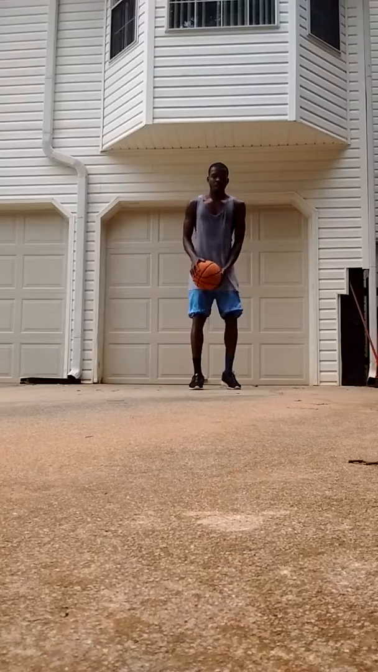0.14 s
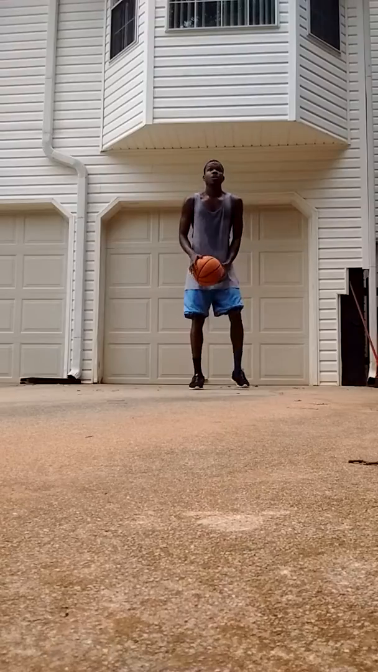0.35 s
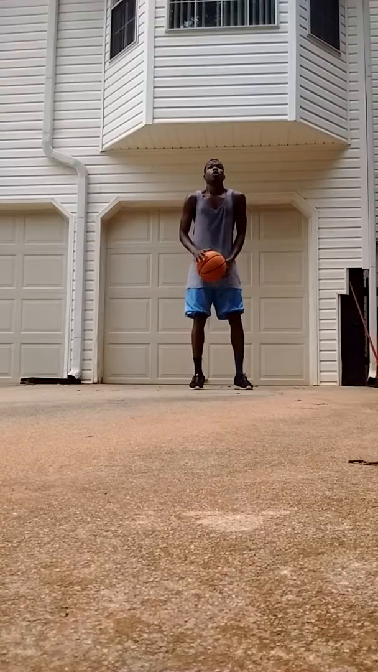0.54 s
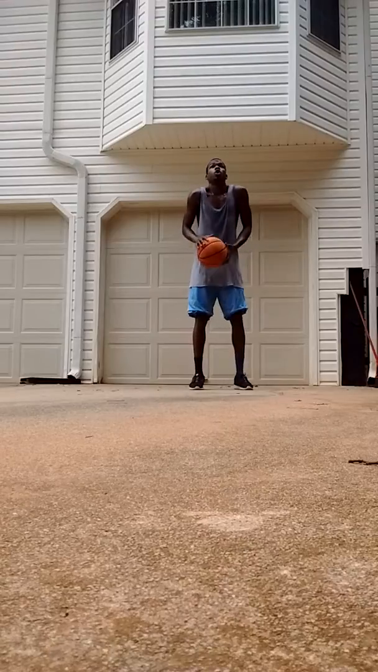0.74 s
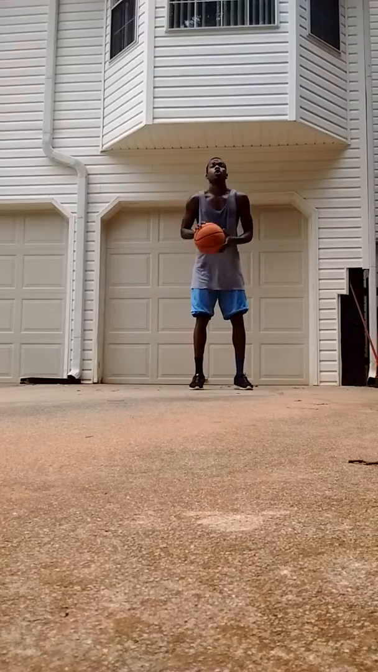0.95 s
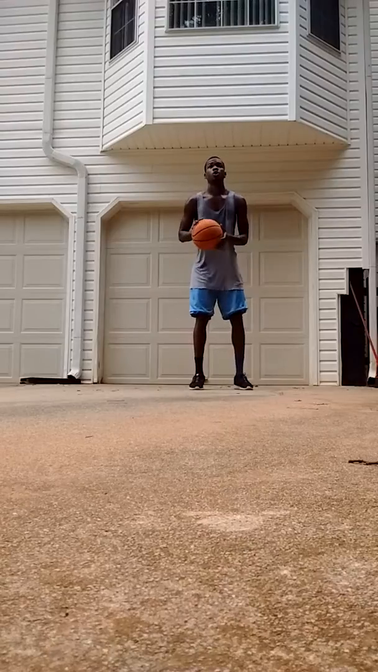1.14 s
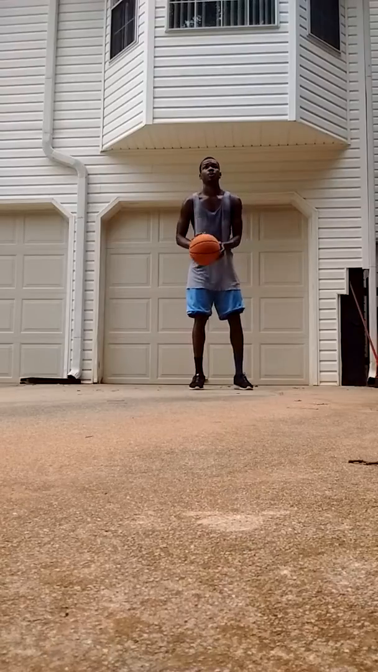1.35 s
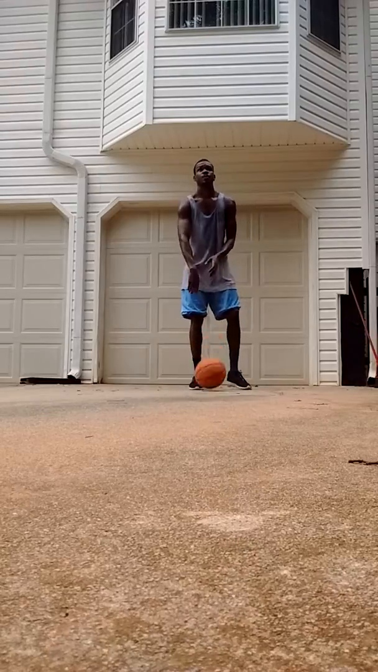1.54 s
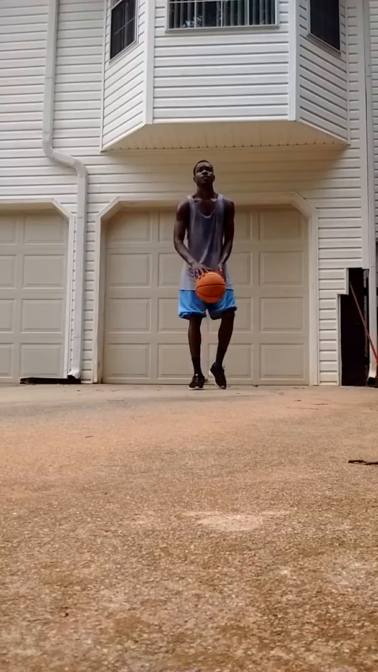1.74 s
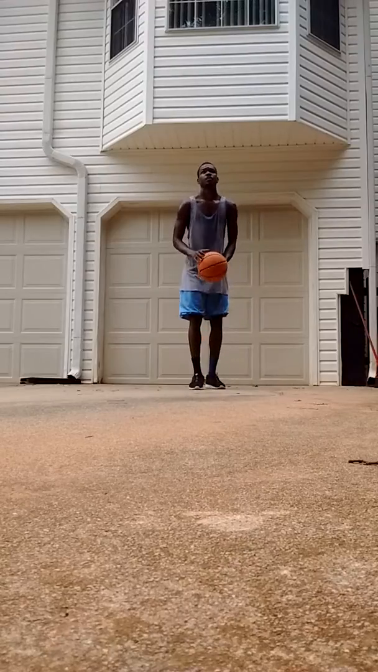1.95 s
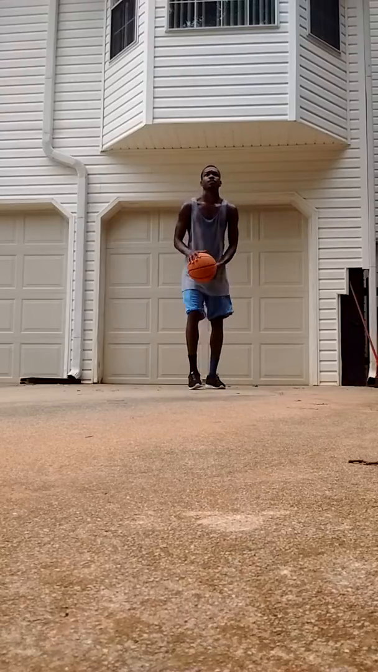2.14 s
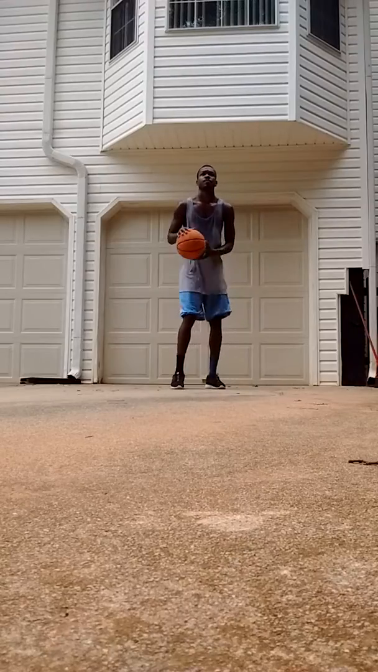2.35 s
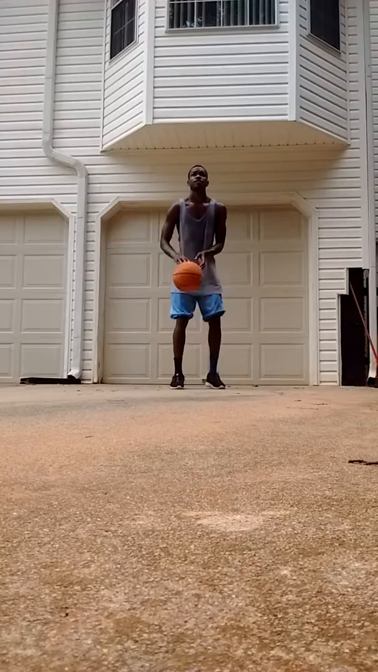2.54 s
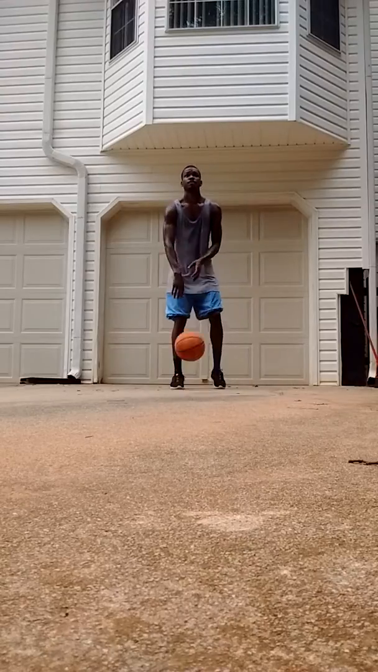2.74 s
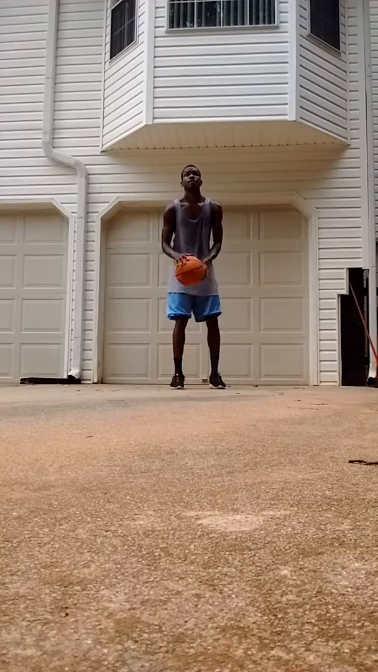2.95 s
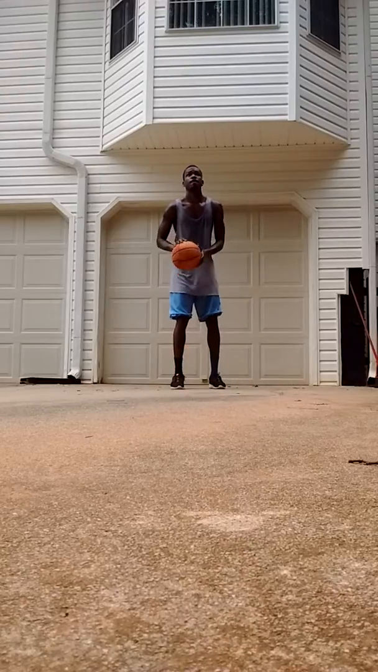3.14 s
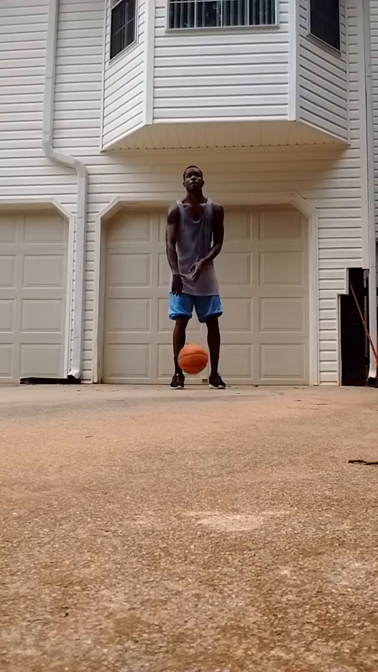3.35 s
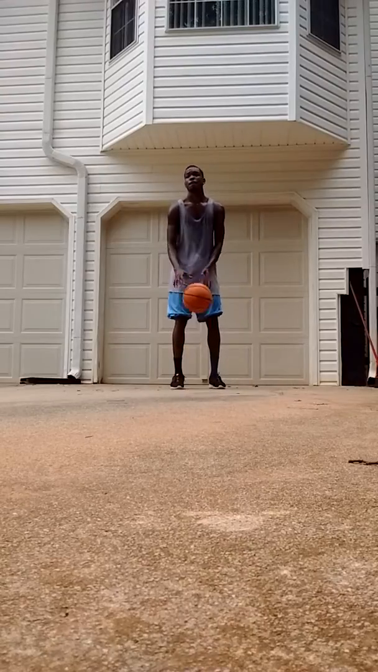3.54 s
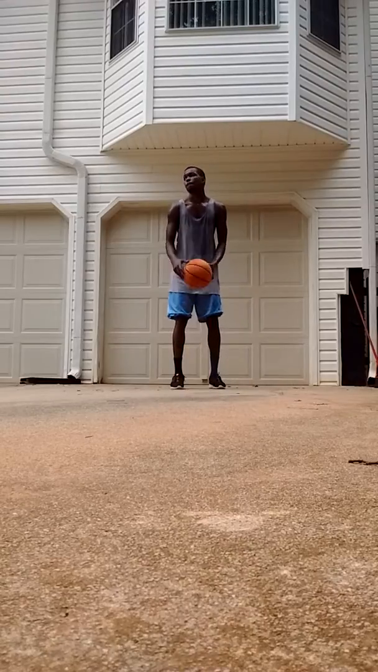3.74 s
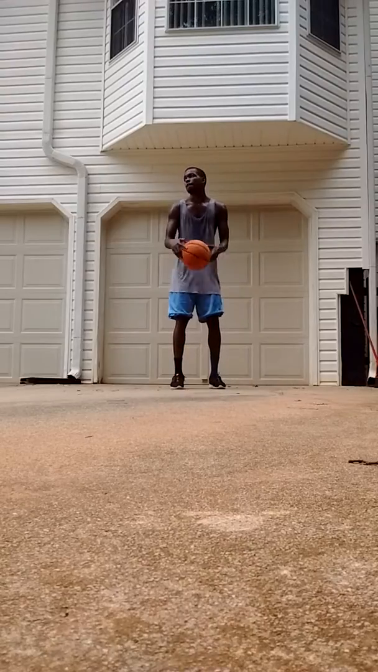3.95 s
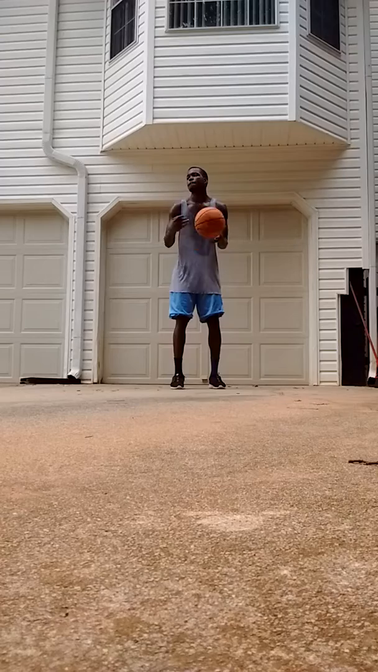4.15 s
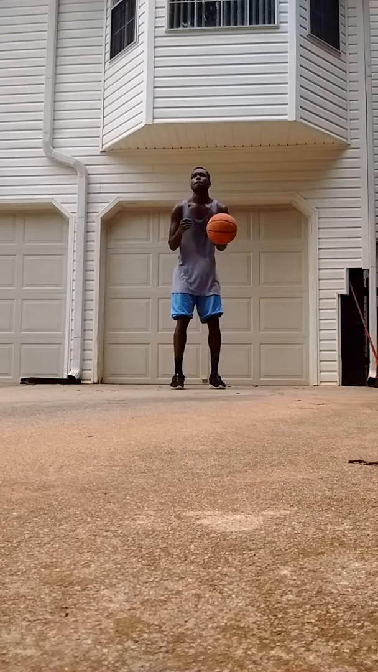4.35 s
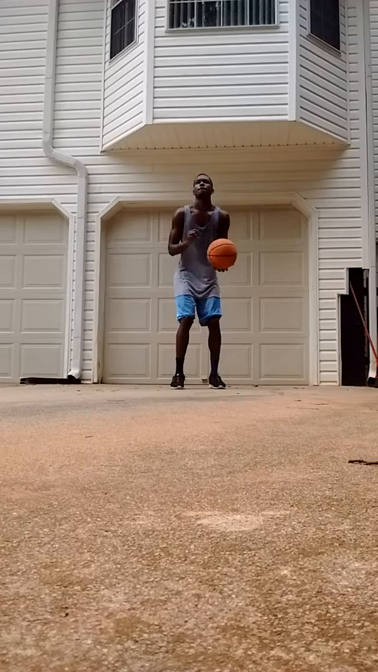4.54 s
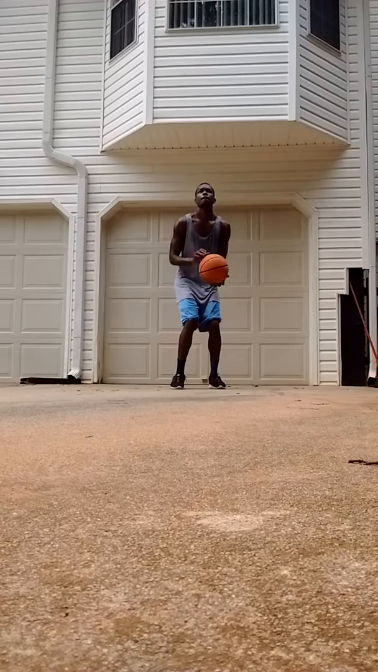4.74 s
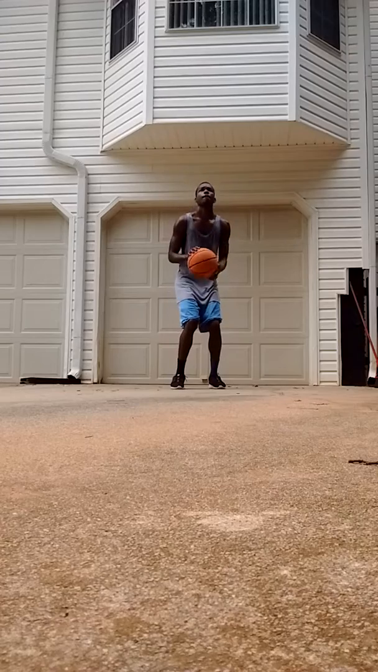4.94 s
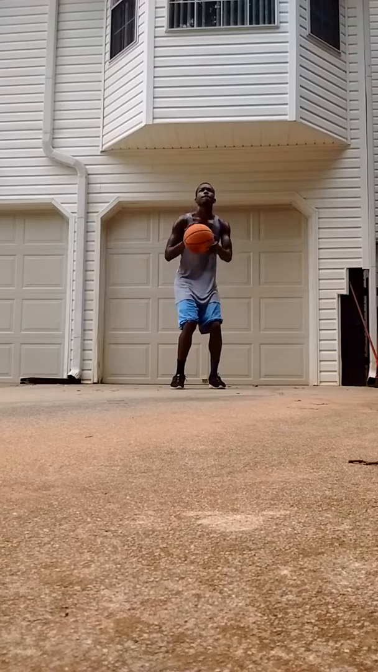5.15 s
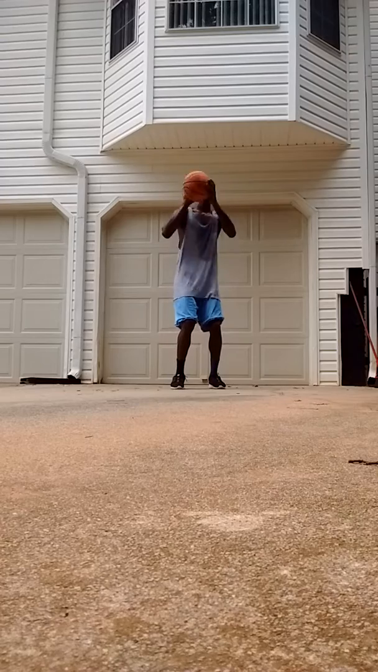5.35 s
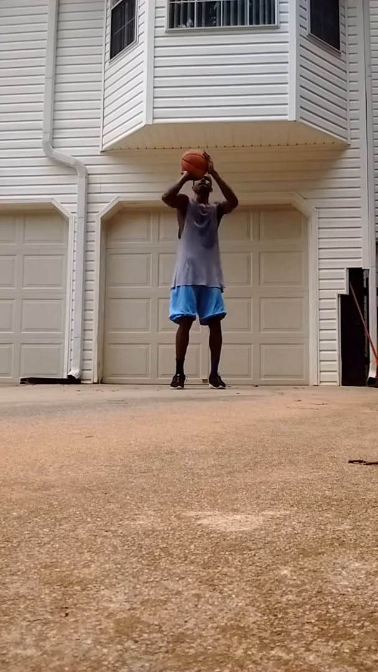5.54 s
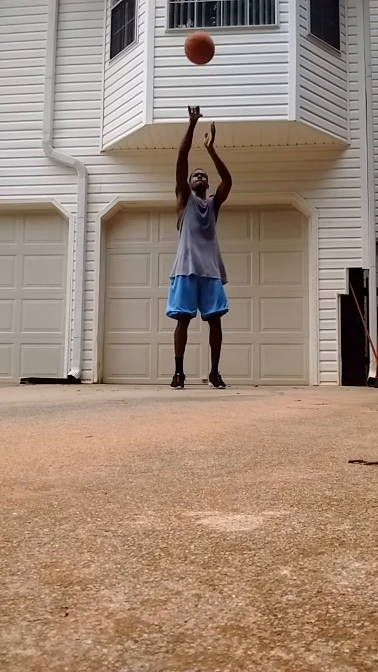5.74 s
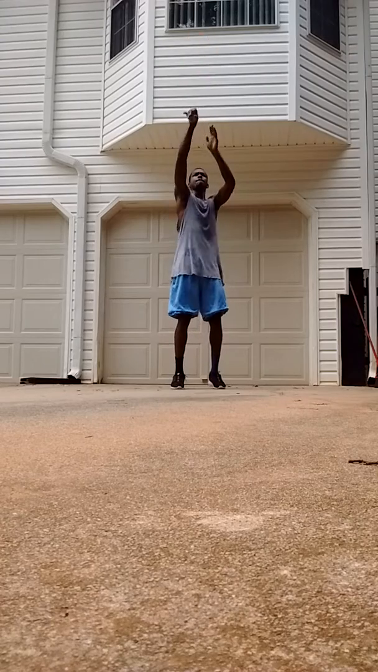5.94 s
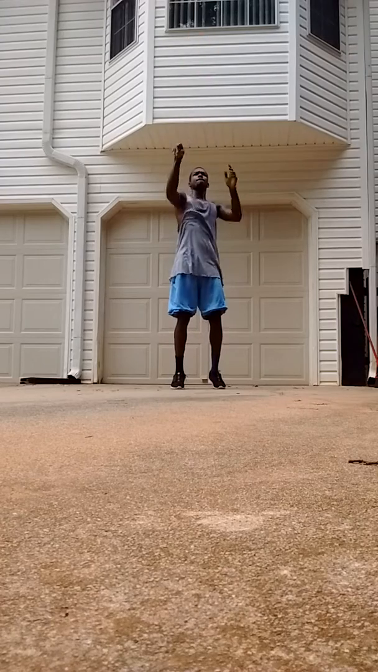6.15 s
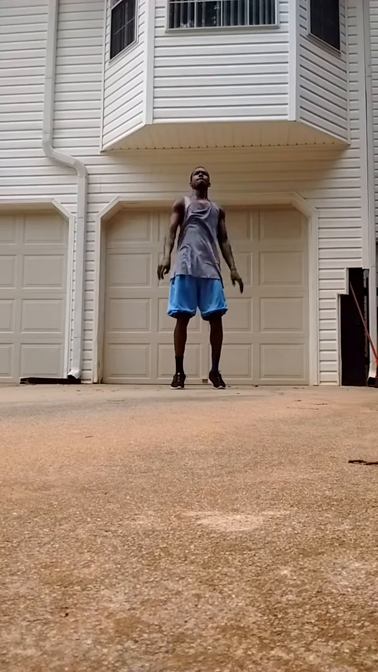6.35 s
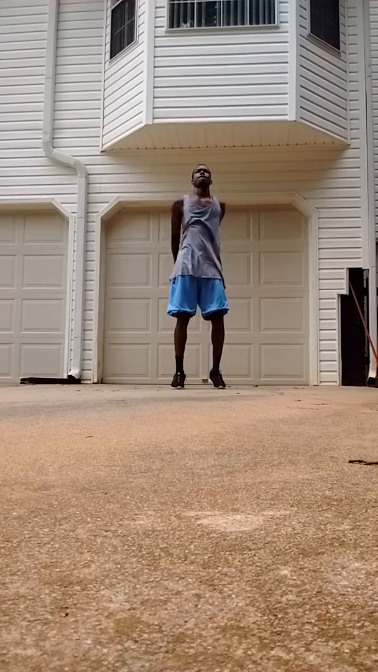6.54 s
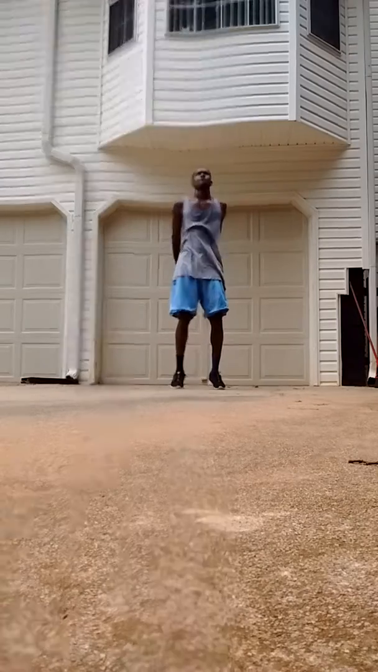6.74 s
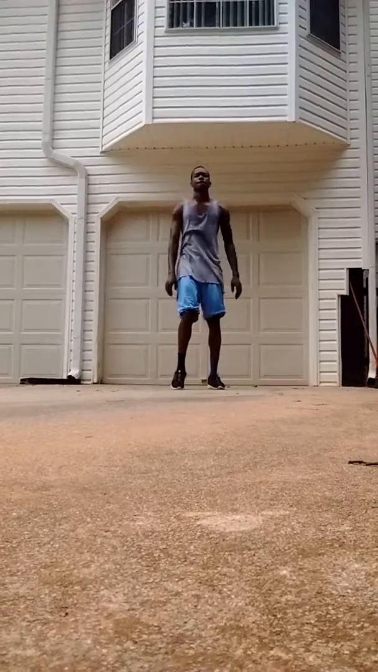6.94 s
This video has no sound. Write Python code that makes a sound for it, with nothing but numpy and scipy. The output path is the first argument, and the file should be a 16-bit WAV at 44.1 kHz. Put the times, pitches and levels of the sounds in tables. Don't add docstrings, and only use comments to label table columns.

```python
import sys
import numpy as np
from scipy import signal
from scipy.fft import rfft, irfft, next_fast_len
from scipy.io import wavfile
from scipy.ndimage import map_coordinates

SR = 44100
rng = np.random.default_rng(int(sys.argv[2]) if len(sys.argv) > 2 else 0)


def unload_wav(signal):
    wavfile.write(
        sys.argv[1],
        SR,
        np.round(np.clip(np.atleast_2d(signal).T, -1, 1) * 32767).astype(np.int16),
    )


def linear_from_db(decibels):
    return 10 ** (np.asarray(decibels, float) / 20)


N = 308259

# [f/Hz, density level/dB]
TRAFFIC_COLOUR = [(12, -53), (20, -12), (85, -8.5), (123, 2), (145, -3), (209, -4), (261, -10), (533, -15),
                  (676, -13), (783, -21), (1600, -38.5), (2080, -112), (3520, -120)]
LEAF_COLOUR = [(300, -51), (600, 0), (1000, -3), (2000, -8.5), (4500, -10.5), (6000, -18), (9000, -21.5),
               (12000, -29.5), (14200, -28.5), (14700, -28.5), (15200, -28), (15800, -60)]
INSECT_COLOUR = [(5000, -7), (6500, -5.5), (8000, 2), (9500, -7), (12000, -30), (14000, -12), (15700, -70)]
CICADA_COLOUR = [(3000, -26), (4000, -1), (4600, -3.5), (5400, -7.5), (6500, -26)]
ENGINE_COLOUR = [(25, -5), (50, -16), (80, 7), (100, -11.5), (170, -19), (230, -35), (400, -46.5)]
DRAUGHT_COLOUR = [(90, -34), (130, -1), (205, 3), (300, -3.5), (600, -9), (900, -43)]
# [t/s, engine level/dB]
VEHICLE = [
    (0, -29.5),
    (1.1, -32),
    (1.6, -26.5),
    (2.6, -28.5),
    (4, -39),
    (6.3, -36),
    (6.6, -33),
]
# [start t/s, length/s, level/dB]
WHINES = [
    (0, 0.33, -30.5),
    (0.846, 0.87, -29),
    (2.2, .55, -32),
]
# [f/Hz, t60/s]
YARD_DECAY = [(100, 0.27), (1000, 0.21), (3000, 0.39), (6000, 0.072), (12000, 0.18)]
# [t/s, level/dB, f/Hz, t60/s]
BOARD_SWINGS = [
    (6.794, -10, 156, 0.072),
    (6.7994, 1.5, 101, 0.052),
    (6.838, -16, 131.6, 0.27),
    (6.8621, -8.5, 131, 0.12),
]
# [t/s, rim level/dB, board knock level/dB]
HOOP_CONTACTS = [(6.787, -5, -16), (6.7946, -12, -25), (6.8013, -13.5, -8), (6.8062, -29, -17),
                 (6.8165, -18, -8), (6.842, -30, -8), (6.849, -25, -14), (6.8542, -11, -6),
                 (6.862, -12, -14.5), (6.8652, -14, -18), (6.876, -19, -16.5), (6.884, -25, -20),
                 (6.919, -40, -22.5)]
# [f/Hz, level/dB, t60/s]
BOARD_MODES = [(253, -2.5, 0.034), (455, -4.5, 0.026), (600, 3, 0.014)]
RIM_MODES = [(773, 1, 0.042), (942, 2.5, 0.048), (1112, -2.5, 0.069), (1334, 1.5, 0.037),
             (1585, -13, 0.039), (1586, -4, 0.056), (1910, -16, 0.035), (2900, -18, 0.043),
             (4100, -14, 0.037)]
TICK_MODES = [(4600, -1, .008), (3900, -6, .004), (5400, -6, .004), (8200, -7, .004)]
BALL_AIR_MODES = [(326, -34, 0.057), (983, -20, 0.034), (1195, -26.5, 0.025), (1816, -13, 0.012),
                  (2100, -28, 0.0092), (3280, 2.5, 0.0031)]
DOOR_MODES = [(1142, -24.5, 0.036), (1900, -30.5, .02)]
# [t/s, level/dB]
TICK = (6.8225, -4.5)
# [t/s, push level/dB, push f/Hz, sizzle level/dB, ping level/dB]
BOUNCES = [
    (1.6234, 6, 200, -2.5, -2),
    (2.7551, 2, 200, -7, -5.5),
    (3.4365, 0, 150, -19.5, -1),
]
# [f/Hz, phase/turns]
AXIS_PHASE = [(0, 0), (800, .1), (1750, .5), (3200, 1), (6350, 2), (8000, 2.5), (12200, 3.5), (13950, 4),
              (15100, 4.5), (22050, 7)]
# [f/Hz, level/dB]
RIGHT_PORT = [(100, -1.7), (3000, -0.4), (5000, -2.5), (8100, 6.5), (11000, 7), (15000, -7.5)]
# [t/s, lowest gain level/dB]
DUCKS = [
    (1.623, -19.5),
    (2.757, -20),
    (3.44, -18),
    (6.799, -15),
]


def along(points, hz):
    f, v = np.transpose(points)
    return np.interp(np.log(hz + 1), np.log(f + 1), v)


def decay(db, t, t60):
    return linear_from_db(db - 60 * t / t60)


def unit(x):
    return x / np.sqrt(np.mean(x ** 2) + 1e-20)


def wobble(rate):
    return map_coordinates(rng.standard_normal(int(N * rate / SR) + 4), [np.arange(N) * rate / SR])


def filtered(x, response):
    m = next_fast_len(N + 8192)
    return irfft(rfft(x, m) * response(np.fft.rfftfreq(m, 1 / SR)), m)[..., :N]


def noise(colour):
    return unit(filtered(rng.standard_normal(N), lambda hz: linear_from_db(along(colour, hz))))


def grit(t, kernel):
    return np.convolve(rng.standard_normal(len(t)), kernel, 'same')


def place(track, s, sound):
    track[round(s * SR):][:len(sound)] += sound


def arrive(x, side):
    half = np.array([[1], [-1]]) * side / 2
    return filtered(x, lambda hz: np.exp(-2j * np.pi * half * np.interp(hz, *np.transpose(AXIS_PHASE))))


def ring(modes, t, scatter_db, rough):
    total = np.zeros(len(t))
    for hz, db, t60 in modes:
        drift = rng.uniform(0, np.pi) + rough * np.cumsum(rng.standard_normal(len(t)))
        level = decay(db + rng.normal(0, scatter_db), t, t60)
        total += level * np.sin(2 * np.pi * hz * t + drift)
    return (1 - np.exp(-t / .0003)) * total


def traffic():
    swell = linear_from_db(-25.5 + 1.4 * wobble(8.0))
    return swell * (arrive(noise(TRAFFIC_COLOUR), 0.7) + linear_from_db(-4.5) * arrive(noise(TRAFFIC_COLOUR), -0.49))


def greenery():
    t = np.arange(N) / SR
    calm_db = np.interp(t, [0.98, 5.8], [0, -4])
    leaves = linear_from_db(-36 + calm_db + 0.45 * wobble(5.21))
    insects = linear_from_db(-46.5 + calm_db + 0.9 * wobble(12))
    since = t - 0.683
    call = linear_from_db(-37 - 35 * since) + linear_from_db(-51.5 - 16 * since)
    cicada = np.clip(since / 0.068, 0, 1) * call * linear_from_db(wobble(17.55))

    def one_side():
        hiss = leaves * noise(LEAF_COLOUR) + insects * noise(INSECT_COLOUR)
        return hiss + cicada * noise(CICADA_COLOUR)

    both = arrive(one_side(), 1) + linear_from_db(-2) * arrive(one_side(), -1)
    return both + linear_from_db(-4.0) * arrive(leaves * noise(LEAF_COLOUR), 0.44)


def vehicle():
    engine_db = np.interp(np.arange(N) / SR, *np.transpose(VEHICLE))
    return linear_from_db(engine_db + 2 * wobble(3.5)) * noise(ENGINE_COLOUR)


def whine():
    t, edge_s = np.arange(N) / SR, 0.14
    spells = np.zeros(N)
    for s, length, db in WHINES:
        inside = np.minimum(t - s, s + length - t)
        spells += linear_from_db(db) * np.clip(inside / edge_s + 1, 0, 1)
    return spells * linear_from_db(-2 + 3 * wobble(7)) * np.sin(2 * np.pi * 368 * t + .9 * wobble(9))


def fan():
    t = np.arange(N) / SR
    on_s, rise_s = 3.1, 1.9
    fan_db = np.interp(t, [on_s, on_s + rise_s], [-38, -27])
    hum = linear_from_db(fan_db - 1 + 3 * wobble(8)) * np.sin(2 * np.pi * 119.5 * t + .7 * wobble(9))
    return hum + linear_from_db(fan_db - 3.5 + 0.81 * wobble(3.02)) * noise(DRAUGHT_COLOUR)


def surroundings():
    return traffic() + greenery() + arrive(vehicle() + whine() + fan(), 0.23)


def yard(x):
    hz, t, z = signal.stft(rng.standard_normal((2, SR // 3)), SR, nperseg=256)
    hz = hz[:, None]
    z = z * decay(0, t, along(YARD_DECAY, hz)) / (1 + (hz / 3500) ** 2)
    tail = signal.istft(z, SR, nperseg=256)[1]
    delayed = np.pad(x, (300, 0))[None]
    wet = signal.fftconvolve(delayed, tail / np.linalg.norm(tail[0]), axes=1)[:, :N]
    return arrive(wet[0], 1) + arrive(wet[1], -1.11)


def dry_tick():
    out, t = np.zeros(N), np.arange(SR // 20) / SR
    s, db = TICK
    snap = decay(-3, t, .003) * grit(t, [.5, .7, .5])
    place(out, s, linear_from_db(db) * (ring(TICK_MODES, t, scatter_db=.5, rough=.02) + snap))
    return out


def hoop():
    boom, clank, t = np.zeros(N + SR), np.zeros(N + SR), np.arange(SR // 5) / SR
    for s, db, hz, t60 in BOARD_SWINGS:
        place(boom, s, decay(db, t, t60) * np.sin(2 * np.pi * hz * t))
    for s, rim_db, knock_db in HOOP_CONTACTS:
        steel = linear_from_db(rim_db - 5) * ring(RIM_MODES, t, scatter_db=3, rough=.04)
        rattle = decay(rim_db - 3, t, 0.047) * rng.standard_normal(len(t))
        knock = linear_from_db(knock_db) * ring(BOARD_MODES, t, scatter_db=1.5, rough=0.018)
        place(clank, s, steel + rattle + knock)
    place(boom, HOOP_CONTACTS[0][0], decay(-10, t, 0.0052) * grit(t, [.5, .7, .5]))
    return boom[:N] + filtered(clank[:N], lambda hz: 1 / (1 + 1j * hz / 3500) ** 2)


def door_echo(sound, t):
    scatter = rng.standard_normal(200) * linear_from_db(-np.arange(200) * 0.49)
    smear = np.convolve(scatter, np.hanning(17))
    echo = linear_from_db(-49) * np.convolve(sound, smear)[:len(t)]
    return echo + ring(DOOR_MODES, t, scatter_db=0.0, rough=.04)


def ball():
    body, skin, t = np.zeros(N + SR), np.zeros(N + SR), np.arange(SR // 4) / SR
    for s, push_db, push_hz, sizzle_db, ping_db in BOUNCES:
        push = decay(push_db, t, .011) * np.cos(2 * np.pi * push_hz * t) * (1 - np.exp(-t / .00006))
        recoil = -decay(0, t, .11) * np.sin(2 * np.pi * 88 * t)
        recoil += decay(-10, t, .12) * np.sin(2 * np.pi * 165 * t)
        recoil *= linear_from_db(-8 + 0.35 * push_db)
        slap = decay(-6.5, t, .004) * np.sin(2 * np.pi * 2900 * t)
        sizzle = decay(sizzle_db, t, 0.0027) * grit(t, [.4, .6, .4])
        ping = linear_from_db(ping_db) * ring(BALL_AIR_MODES, t, scatter_db=1.5, rough=.05)
        place(body, s, push + recoil + slap)
        place(skin, s, sizzle + ping)
        place(skin, s + .0122, door_echo(slap + 3 * ping, t))
    return body[:N], skin[:N]


def gain_control():
    t = np.arange(N) / SR
    creep_db_per_s, duck_s, hold_s = 10.5, 0.038, 0.25
    gain = np.minimum(0, -17.5 + creep_db_per_s * t)
    for s, low_db in DUCKS:
        after = np.maximum(t - s, 0)
        creep = np.minimum(0, low_db + creep_db_per_s * np.maximum(after - hold_s, 0))
        fall = (gain[round(s * SR)] - low_db) * np.exp(-after / duck_s)
        gain = np.where(t > s, creep + fall, gain)
    return gain


def clamp():
    blows = [(s, .007) for s, *_ in BOUNCES] + [(TICK[0], .015)]  # (s, squeeze s)
    after = np.array([(np.arange(N) / SR - s - .002) / length for s, length in blows])
    squeeze = np.clip(np.minimum(8 * after, 2 - after), 0, 1).max(axis=0)
    return linear_from_db(-12.5 * squeeze)


def scene():
    (body, skin), shot = ball(), hoop()
    bounces = arrive(body, 0.015) + arrive(skin, 1) + linear_from_db(-25) * yard(body + skin)
    throw = arrive(shot, 1) + linear_from_db(-21.0) * yard(shot)
    bed = linear_from_db(gain_control()) * surroundings()
    return clamp() * (bed + throw + arrive(dry_tick(), 1)) + bounces


def top_cut(x):
    return signal.sosfilt(signal.butter(12, 16330, fs=SR, output="sos"), x)


def record(dry):
    x = filtered(dry, lambda hz: 1j * hz / (25 + 1j * hz) / (1 + (hz / 15700) ** 60))
    right = -filtered(x[1], lambda hz: linear_from_db(along(RIGHT_PORT, hz)))
    x = np.array([x[0], right])
    x = x / (1 + np.abs(x / .99) ** 8) ** (1 / 8)
    return top_cut(x)


dry = scene()
out = record(dry)
unload_wav(out)
```